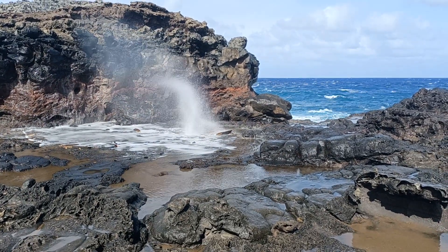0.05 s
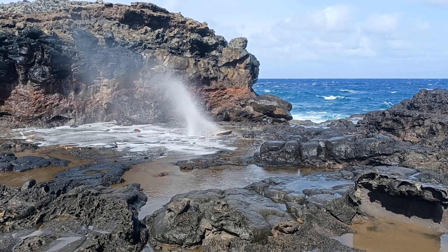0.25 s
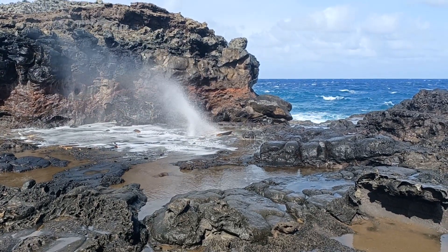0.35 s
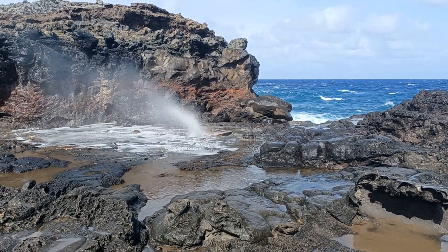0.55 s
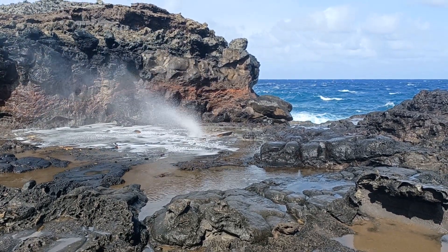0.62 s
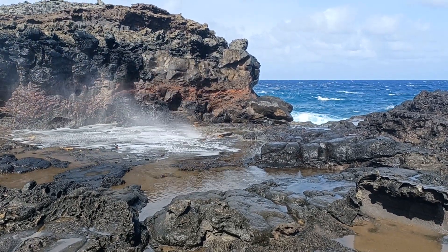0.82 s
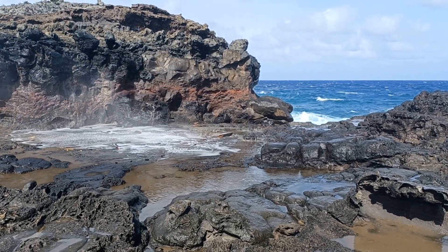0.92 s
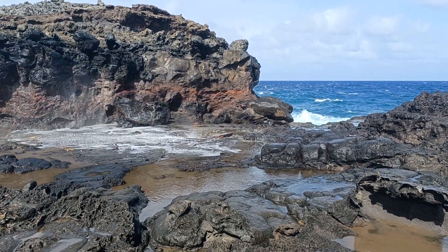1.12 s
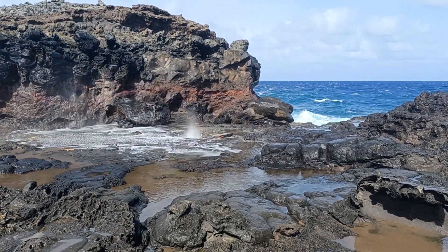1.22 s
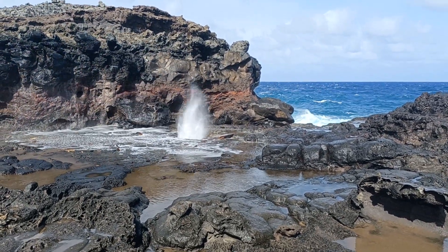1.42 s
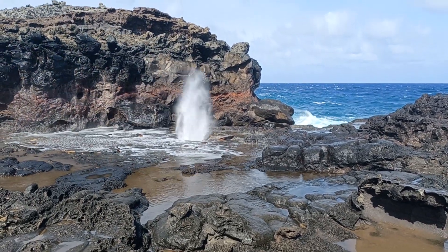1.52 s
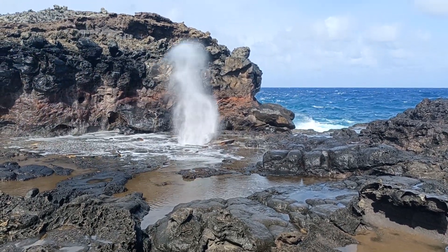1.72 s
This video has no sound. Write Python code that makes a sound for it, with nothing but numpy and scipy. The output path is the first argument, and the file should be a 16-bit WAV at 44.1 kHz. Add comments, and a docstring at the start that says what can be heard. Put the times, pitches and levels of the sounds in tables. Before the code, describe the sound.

Wind thumps and tears at the microphone on a rocky shore, with quieter sea rush behind

```python
"""Gusty sea wind at the two ports of a microphone on a rocky shore.
Throughout, surf rushes and blowhole spray hisses: shaped noise, with bubble rings and splash swishes.
A first gust flutters and pops near 0.3 s: noise for three sizes of eddy, and brief sagging sines.
After a lull the hardest gusts, 0.6 to 0.9 s, tear and snap at the port edges.
Weaker gusts follow, with rumble and tearing dying down toward the end."""
import sys
import numpy as np
from scipy import signal
from scipy.fft import rfft, irfft, next_fast_len
from scipy.io import wavfile
from scipy.ndimage import uniform_filter1d, map_coordinates

SR = 44100
rng = np.random.default_rng(int(sys.argv[2]) if len(sys.argv) > 2 else 0)


def transcribe(u):
    """Save the signal u as a 16-bit wav file named by the first command-line argument.

    u: samples, shape (n,) or (channels, n), limited to [-1, 1]; the rate is SR.
    q: integer samples, one column per channel.
    """
    v = np.clip(np.atleast_2d(u).T, -1, 1)
    q = np.round(v * 32767).astype(np.int16)
    wavfile.write(sys.argv[1], SR, q)


N = 77175

# Fine falling spray. Each row: time in seconds, level in dB before SPRAY_GAIN_DB.
SPRAY_LEVEL = [(0, -55.5), (.3, -54.5), (.42, -54), (.53, -54), (.61, -53), (.705, -53), (.79, -55),
               (.84, -53), (1.1, -54.5), (1.27, -57), (1.55, -56.5), (1.7, -55.5), (1.75, -56)]
# Spectrum of the spray. Each row: frequency in Hz, relative density in dB per Hz.
SPRAY_SPECTRUM = [(1000, -34), (2800, -3.5), (4000, -3.5), (5600, 1.5), (7000, -1), (8400, -10), (9800, -3),
                  (11300, -3.5), (13000, 0.5), (15800, -4.5)]
# Surf on the rocks. Each row: time in seconds, level in dB before SURF_GAIN_DB.
SURF_LEVEL = [(0, -44), (.05, -47), (.14, -48), (.23, -44.5), (.31, -49), (.42, -44.5), (.53, -48),
              (.62, -44), (.7, -45.5), (.84, -45.5), (.97, -47.5), (1.03, -48), (1.12, -46.5), (1.2, -47.5),
              (1.28, -49.5), (1.38, -46.5), (1.5, -48), (1.62, -48.5), (1.68, -42.5), (1.75, -46.5)]
# Spectrum of the surf's rush. Each row: frequency in Hz, relative density in dB per Hz.
SURF_SPECTRUM = [(60, -47), (150, -41), (250, -10.5), (450, -1), (750, -1), (1100, -8), (1500, -6),
                 (2050, -6.5), (2700, -13), (4000, -18.5), (9000, -32.5)]
# Left-right likeness of the sea. Each row: frequency in Hz, correlation from -1 to 1.
SEA_CORRELATION = [(300, 0.94), (1000, -0.74), (1450, -0.18), (2050, 0.52), (3150, -0.32), (4600, 0.14),
                   (7400, 0.0056), (8600, 0.0066), (11000, -0.15), (15000, 0.042)]
# Sheets of water landing. Each row: centre in seconds, half length in seconds,
# middle pitch in Hz, rms level at the peak in dB.
SPLASHES = [(0.608, .04, 6040, -54), (.682, 0.013, 1680, -40), (0.707, 0.011, 2300, -42),
            (0.716, 0.022, 5220, -51), (0.845, 0.046, 1600, -47), (1.038, 0.029, 1400, -50),
            (1.664, .025, 1810, -55)]
# Large eddies. Each row: time in seconds, level in dB before RUMBLE_GAIN_DB, left minus right in dB.
RUMBLE_LEVEL = [(0.0, -44, 7), (0.022, -35.5, 2.5), (0.052, -87, 13), (0.082, -53, 28), (0.18, -53.5, -26),
                (0.217, -34, -3), (0.258, -48, -26), (0.286, -56.5, 14), (0.316, -41, 22), (0.35, -33.5, 3),
                (0.39, -42, 8), (0.452, -49, 10), (0.614, -40.5, 7), (0.638, -38.5, 16), (0.7, -34.5, -2.5),
                (0.842, -35, -4), (0.856, -46, 8), (0.891, -31, 3), (0.954, -46.5, 10), (1.056, -54, 23.5),
                (1.12, -42, 4.5), (1.378, -38.5, 8), (1.442, -60, 24), (1.516, -59, -4),
                (1.555, -47.5, 12.5), (1.646, -46.5, 7), (1.68, -49, 17), (1.75, -55, 19)]
# Middling eddies. Each row: time in seconds, level in dB before FLUTTER_GAIN_DB.
FLUTTER_LEVEL = [(0.0, -69), (0.018, -34), (0.048, -55), (0.17, -40.5), (0.214, -32.5), (0.248, -40),
                 (0.272, -25.5), (0.286, -31), (0.326, -24), (0.374, -33.5), (0.458, -50), (0.476, -35.5),
                 (0.53, -46), (0.574, -28.5), (0.608, -43.5), (0.622, -25), (0.642, -27.5), (0.658, -28.5),
                 (0.696, -20.5), (0.71, -27), (0.736, -33.5), (0.788, -21.5), (0.814, -26), (0.842, -24.5),
                 (0.92, -26.5), (0.934, -38.5), (1.008, -33), (1.028, -49.5), (1.134, -43.5), (1.15, -67),
                 (1.176, -44), (1.188, -28.5), (1.212, -38.5), (1.266, -30.5), (1.29, -36), (1.328, -28),
                 (1.364, -34), (1.418, -43), (1.52, -51), (1.544, -31), (1.568, -42.5), (1.656, -35.5),
                 (1.734, -44), (1.75, -37)]
# Small eddies. Each row: time in seconds, level in dB before TEAR_GAIN_DB.
TEAR_LEVEL = [(0, -52.5), (.2, -47.5), (.26, -45.5), (.298, -29), (.35, -41.5), (.42, -57), (.54, -85),
              (.645, -38), (.676, -26), (.705, -42.5), (.76, -39.5), (.79, -29.5), (.846, -27.5),
              (.87, -40), (.905, -38), (.94, -49), (1.05, -39.5), (1.085, -80), (1.28, -53), (1.335, -35.5),
              (1.42, -58), (1.75, -83)]
# Spectra of the three eddy sizes. Each row: frequency in Hz, relative density in dB per Hz.
RUMBLE_SPECTRUM = [(15, -16), (30, -15), (55, -13), (85, -2), (120, 1), (170, -8), (300, -6.5), (700, -68)]
FLUTTER_SPECTRUM = [(50, -70), (130, -23), (190, -4), (235, -0.5), (310, -0.5), (420, -1), (560, -12),
                    (750, -18.5), (1100, -35), (2500, -56.5)]
TEAR_SPECTRUM = [(150, -45), (350, -30), (540, 8), (720, -3.5), (1000, -10.5), (1400, -20.5), (2200, -35),
                 (5000, -48.5)]
# Single strong eddies at the ports. Each row: centre in seconds, pitch in Hz before scatter and sag,
# envelope peak in dB, half length in cycles.
POPS = [(.272, 240, -17, 0.83), (.28, 527, -19, 1.4), (.302, 593, -18, 1.64), (0.318, 370, -16, 1.1),
        (.332, 390, -14, 1.14), (0.411, 125, -25, 2.05), (0.66, 238, -9, 0.93), (.682, 560, -9.5, 0.65),
        (0.689, 270, -10.5, 0.76), (0.786, 410, -43, 2.4), (.849, 480, -17, 2.6), (.9, 483, -20, 0.9),
        (1.124, 370, -33, 0.91), (1.165, 425, -26.5, 0.84), (1.197, 265, -23, 0.72),
        (1.224, 164, -29, 0.75), (1.271, 338, -21, 0.54)]
# Gusts breaking on a port edge. Each row: centre in seconds, envelope peak in dB before the lean,
# left minus right in dB.
SNAPS = [(.302, -33, -5), (.617, -34, -7), (.635, -38, -4), (.655, -31, -3), (.662, -27, 2), (.681, -23, 7),
         (.745, -37, 3), (.775, -32, -1), (.803, -31, -1), (.816, -30, -1), (.832, -28, -4), (.838, -29, 4),
         (.846, -28, -4), (.861, -33, -2), (1.323, -36, -4)]

TOP_HZ = 15830
SPRAY_GAIN_DB, SURF_GAIN_DB = 4, -0.5
RUMBLE_GAIN_DB, FLUTTER_GAIN_DB, TEAR_GAIN_DB = 3.5, 2, 2
DROPS_PER_S, DROP_HZ, DROP_LOG_SCATTER = 260, 1506, 0.3425
DROP_DECAY_CYCLES, DROP_SIZE_SPREAD_DB, DROPS_GAIN_DB = 3.4, 3, -9  # gain relative to the rush
SPLASH_WIDTH_OCTAVES, SPLASH_GRAIN_DB = 0.36, 2.5
POP_LOG_SPREAD, POP_SAG_PER_CYCLE = 0.24, 0.12  # scatter between ports; share of pitch lost per cycle
SNAP_HZ, SNAP_HALF_S, SNAP_LOG_SCATTER = 930, 0.00078, 0.088
LEFT_RIGHT = np.array([[1], [-1]])


def amp(db):
    """Decibels to gain."""
    return 10 ** (np.asarray(db) / 20)


def unit(x):
    """Scale to rms 1."""
    return x / np.sqrt(np.mean(x ** 2) + 1e-20)


def along(points, hz):
    """Read (Hz, value) points on a log frequency axis."""
    point_hz, value = np.transpose(points)
    return np.interp(np.log(hz + 1), np.log(point_hz + 1), value)


def curve(rows):
    """Read (s, value) points at every sample."""
    return np.interp(np.arange(N) / SR, *np.transpose(rows))


def wobble(knots_per_s):
    """Smooth random curve through normally distributed knots."""
    knots = rng.standard_normal(N // 16)
    return map_coordinates(knots, [np.arange(N) * knots_per_s / SR], mode="wrap")


def filtered(x, response):
    """Multiply the spectrum of x by a response given as a function of Hz."""
    size = next_fast_len(N + SR // 2)
    spectrum = rfft(x, size) * response(np.fft.rfftfreq(size, 1 / SR))
    return irfft(spectrum, size)[..., :N]


def smooth_twice(x, size, axis=-1):
    """Two running means of equal length."""
    return uniform_filter1d(uniform_filter1d(x, size=size, axis=axis), size=size, axis=axis)


def rush(spectrum, patchy_db):
    """Stereo sea noise, rms 1: random gain patches in time and pitch, correlation set by frequency."""
    cells = signal.stft(rng.standard_normal((2, N)), nperseg=512)[2]
    patches = uniform_filter1d(rng.standard_normal(cells.shape[1:]), size=8, axis=0)
    patches = unit(uniform_filter1d(patches, size=14, axis=1))
    pair = signal.istft(cells * amp(patchy_db * patches), nperseg=512)[1][:, :N]

    def mid_side_response(hz):
        # cos^2 - sin^2 of this angle is the left-right correlation
        angle = np.arccos(np.clip(along(SEA_CORRELATION, hz), -1, 1)) / 2
        return amp(along(spectrum, hz)) * np.array([np.cos(angle), np.sin(angle)])

    mid, side = filtered(pair, mid_side_response)
    return unit(np.array([mid + side, mid - side]))


def spray():
    """Fine water hisses as it falls back: patchy high noise with a slightly wavering level."""
    level_db = curve(SPRAY_LEVEL) + SPRAY_GAIN_DB + 0.49 * wobble(35.7)
    return amp(level_db) * rush(SPRAY_SPECTRUM, patchy_db=1.64)


def drops():
    """Splashing drops: many brief decaying bubble rings scattered from left to right, rms 1."""
    count = int(DROPS_PER_S * N / SR)
    when, where = rng.random((count, 2)).T[:, :, None]
    pitch, size = np.clip(rng.standard_normal((count, 2)), -2, 2).T[:, :, None]
    sample = np.arange(SR // 50)
    cycles = DROP_HZ * np.exp(DROP_LOG_SCATTER * pitch) * sample / SR
    envelope = np.exp(-cycles / DROP_DECAY_CYCLES) * (1 - np.exp(-cycles))
    rings = amp(DROP_SIZE_SPREAD_DB * size) * envelope * np.sin(2 * np.pi * cycles)
    at = ((when * N).astype(int) + sample).ravel()
    pan_angle = where * np.pi / 2
    sides = [np.bincount(at, (pan(pan_angle) * rings).ravel(), N)[:N] for pan in (np.cos, np.sin)]
    return unit(np.array(sides))


def surf():
    """Waves churn on the rocks: a noisy rush with the grain of splashing drops."""
    water = rush(SURF_SPECTRUM, patchy_db=2.0) + amp(DROPS_GAIN_DB) * drops()
    return amp(curve(SURF_LEVEL) + SURF_GAIN_DB + 0.13 * wobble(30)) * water


def splash():
    """Each sheet of water lands with a brief swish: grainy noise in a band around its pitch."""
    out, t = np.zeros((2, N)), np.arange(N) / SR
    for centre_s, half_s, middle_hz, level_db in SPLASHES:
        def band(hz):
            octaves = np.log2((hz + 1) / middle_hz)
            return np.exp(-(octaves / SPLASH_WIDTH_OCTAVES) ** 2 / 2)

        patter = amp(SPLASH_GRAIN_DB * wobble(350)) * rng.standard_normal((2, N))
        swish = unit(filtered(patter, band))
        out += amp(level_db) * np.exp(-((t - centre_s) / half_s) ** 2) * swish
    return out


def eddies(spectrum, lump_rate, lump_db, drift_db):
    """Lumpy turbulence, unrelated at the two ports, evened in mean power, then drifting between them."""
    lumps = amp(lump_db * np.tanh([wobble(lump_rate), wobble(lump_rate)]))
    noise = filtered(lumps * rng.standard_normal((2, N)), lambda hz: amp(along(spectrum, hz)))
    power = smooth_twice(noise ** 2, 1500)
    drift = amp(drift_db * wobble(14.43) * LEFT_RIGHT)
    return unit(drift * noise / np.sqrt(np.abs(power) + 1e-20))


def wind():
    """Three sizes of eddy: large ones rumble with a lean to a port, middling flutter, small tear."""
    time_s, level_db, lean_db = np.transpose(RUMBLE_LEVEL)
    ports_db = np.array([curve(np.c_[time_s, level_db + side * lean_db / 2]) for side in (1, -1)])
    rumble = eddies(RUMBLE_SPECTRUM, lump_rate=40, lump_db=9.5, drift_db=0.0)
    flutter = eddies(FLUTTER_SPECTRUM, lump_rate=110, lump_db=9.5, drift_db=2.0)
    tear = eddies(TEAR_SPECTRUM, lump_rate=160, lump_db=8.5, drift_db=1.5)
    rumble = amp(RUMBLE_GAIN_DB + ports_db) * rumble
    flutter = amp(FLUTTER_GAIN_DB + curve(FLUTTER_LEVEL)) * flutter
    tear = amp(TEAR_GAIN_DB + curve(TEAR_LEVEL)) * tear
    return rumble + flutter + tear


def snaps():
    """A gust breaking away from a port makes the pressure swing for a fast cycle or two."""
    out, t = np.zeros((2, N)), np.arange(N) / SR
    for centre_s, peak_db, lean_db in SNAPS:
        hz = SNAP_HZ * np.exp(SNAP_LOG_SCATTER * rng.standard_normal((2, 1)))
        phase_turns = rng.random() + rng.random((2, 1)) / 4
        swing = np.sin(2 * np.pi * (hz * (t - centre_s) + phase_turns))
        envelope = np.exp(-((t - centre_s) / SNAP_HALF_S) ** 2)
        out += amp(peak_db + lean_db / 2 * LEFT_RIGHT) * envelope * swing
    return out


def pops():
    """Each strong eddy is a short pressure swing that sags in pitch, a little different at each port."""
    out, t = np.zeros((2, N)), np.arange(N) / SR
    for centre_s, hz, peak_db, half_cycles in POPS:
        port_hz = hz * np.exp(POP_LOG_SPREAD * (rng.random((2, 1)) - .5))
        cycles = (t - centre_s) * port_hz
        phase_turns = rng.random() + rng.random((2, 1)) / 2
        turns = cycles - POP_SAG_PER_CYCLE * cycles ** 2 / 2 + phase_turns
        out += amp(peak_db) * np.exp(-(cycles / half_cycles) ** 2) * np.sin(2 * np.pi * turns)
    return out


def scene():
    """Wind on the ports in front of the sea."""
    sea = spray() + surf() + splash()
    return sea + wind() + snaps() + pops()


def record(dry):
    """Band limit: nothing is kept from TOP_HZ up."""
    return filtered(dry, lambda hz: hz < TOP_HZ)


dry = scene()
out = record(dry)
transcribe(out)
```